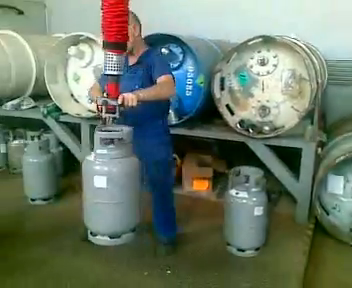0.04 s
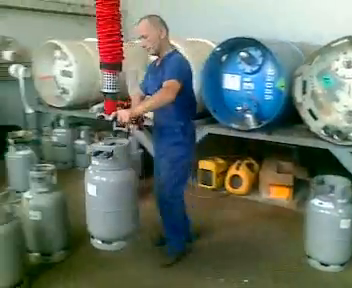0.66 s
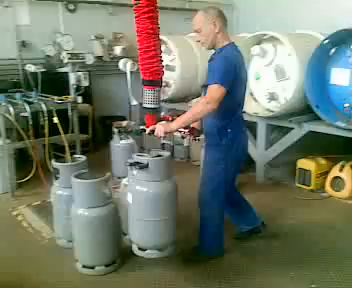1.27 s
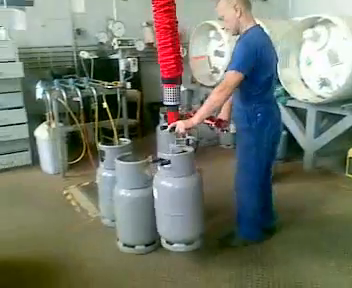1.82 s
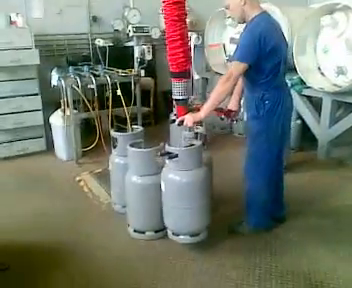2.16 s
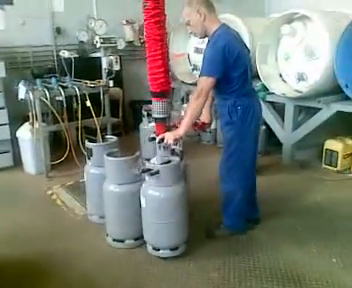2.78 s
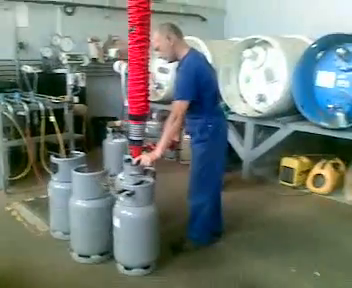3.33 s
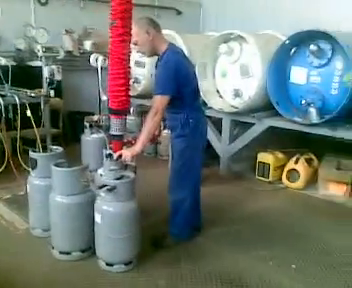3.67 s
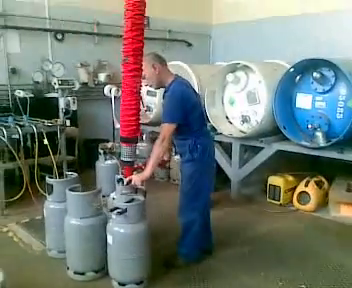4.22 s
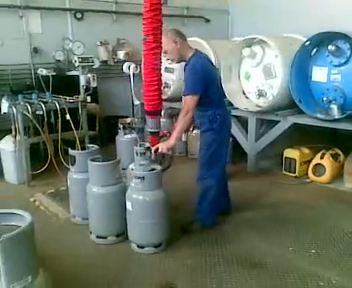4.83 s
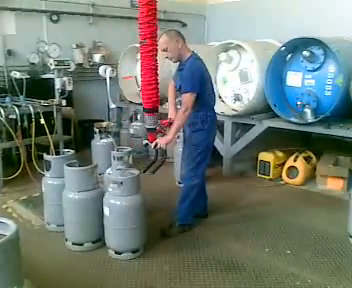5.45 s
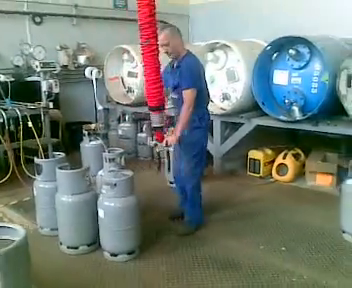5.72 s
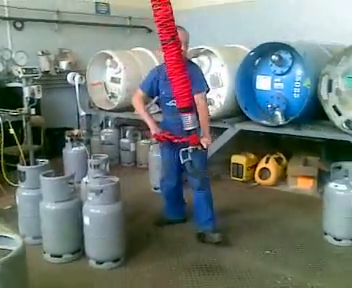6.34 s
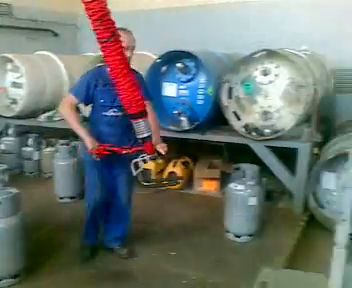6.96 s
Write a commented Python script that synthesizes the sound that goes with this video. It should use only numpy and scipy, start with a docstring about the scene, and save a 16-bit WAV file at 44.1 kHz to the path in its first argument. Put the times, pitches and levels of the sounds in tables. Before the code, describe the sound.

In a workshop, a vacuum lifter's sealed suction head hisses quietly a few metres from a small hand-held microphone. Close handling thumps, soft rubs and rumble are the loudest sounds at first. Then the lifter lets go of its gas cylinder, and a soft rush of air takes over, with a ringing drone, a faint whine, a low hose throb and pump hum. The rush surges twice and loses brightness near the end.

```python
"""A low rumble and dull, dry knocks come first, right at the microphone: a hand on the camera's case.
A few metres off in the workshop, a vacuum tube lifter carries a gas cylinder, its sealed head leaking
a thin hiss. Once the load is set down the valve opens: air rushes up the long hose, rings the head
and the hose, and lets the pump's hum out. The rush dulls as the empty head is carried off."""
import sys
import numpy as np
from scipy import signal
from scipy.fft import rfft, irfft
from scipy.io import wavfile
from scipy.ndimage import map_coordinates

SR = 44100
rng = np.random.default_rng(int(sys.argv[2]) if len(sys.argv) > 2 else 0)


def persist_wave(psi):
    """Save psi, clipped to +-1, as 16-bit WAV."""
    counts = np.round(np.clip(psi, -1, 1) * 32767).astype(np.int16)
    wavfile.write(sys.argv[1], SR, np.atleast_2d(counts).T)


N = 317520
TIME = np.arange(N) / SR
BIN_HZ = np.maximum(np.arange(N // 2 + 1) * SR / N, 1)


# colour of the rushing air, a few metres off: (frequency [Hz], relative level [dB])
RUSH_COLOUR = [(90, -6.5), (170, -4.5), (300, -6.5), (500, -6.5), (680, -12), (1250, -9), (1750, -19),
               (2850, -22.5), (3300, -26.5), (4300, -24.5), (5700, -30.5), (6200, -30.5), (7400, -48.5)]

def suction(valve, carried, draught_db, rush_db=-60.5, flutter_db=0.24, dulling_db=4):
    """Air rushes through the valve and rings the head; carried off, it gains bass and loses treble."""
    jet = noise(colour(RUSH_COLOUR), band=(550, 2500))
    eddies = noise(colour(RUSH_COLOUR), band=(550, 2500))
    air = jet + suction_head(eddies, draught_db)
    bass = signal.sosfiltfilt(signal.butter(2, 400, fs=SR, output="sos"), air)
    treble = signal.sosfiltfilt(signal.butter(2, 1900, "high", fs=SR, output="sos"), air)
    tilt_db = dulling_db * carried
    rush = air + bass * (undb(tilt_db) - 1) + treble * (undb(-tilt_db) - 1)
    return valve * rush * undb(rush_db + draught_db + flutter_db * walk(22))


# surges of the draught: (time [s], length [s], boost [dB])
DRAUGHT_SURGES = [(5.55, 1.0, 5), (6.74, 0.78, 3.5)]

def airflow(carried_drop_db=3.5):
    """The valve opens (0 to 1), the head is carried off (0 to 1), the draught swells and sags (dB)."""
    valve = ramp(start=4.137, length=0.39)
    carried = ramp(start=6.2, length=0.46)
    draught_db = swells(DRAUGHT_SURGES, attack=0.24, release=0.422) - carried_drop_db * carried
    return valve, carried, draught_db


# resonances of the suction head: (frequency [Hz], width [Hz], relative level [dB])
HEAD_MODES = [(440, 8, 10), (463, 11, 15.5), (485, 12, 10), (535, 28, 2), (1105, 8, 6.5), (1355, 16, 13.5),
              (1394, 48, 8)]
# the head drones on the cylinder, and most as it comes off: (time [s], length [s], boost [dB])
SEATED_SWELLS = [(4.15, 1.6, 2.5), (5.1, 0.39, 5.5)]

def suction_head(eddies, draught_db, level_db=-2.0, follow=0.1, rise_per_db=0.0006, wander=0.0012):
    """The head's resonances waver and rise with the draught; the cylinder boosts mostly the low ones."""
    ringing = irfft(rfft(eddies) * np.sqrt(peaks(HEAD_MODES)), N)
    whistle = bend(ringing, rise_per_db * draught_db + wander * walk(1.993))
    drone = signal.sosfiltfilt(signal.butter(4, 800, fs=SR, output="sos"), whistle)
    whine = whistle - drone
    seated_db = swells(SEATED_SWELLS, attack=0.3, release=0.17)
    return undb(level_db + follow * draught_db) * (drone * undb(seated_db) + whine * undb(seated_db / 4))


# air modes of the long hose: (frequency [Hz], width [Hz], relative level [dB])
HOSE_MODES = [(34.8, 6.7, 2.5), (77.3, 8.1, 0), (107, 11, -4), (161.7, 35, -10), (224, 30, -17.5)]

def hose(valve, draught_db, level_db=-52, follow=0.79):
    """The flow rings the air column in the hose, louder as the draught grows."""
    column = noise(np.sqrt(peaks(HOSE_MODES)))
    return valve * column * undb(level_db + follow * draught_db)


def hose_throb(valve, carried, draught_db, hz=35.63, follow=0.35):
    """The hose's two lowest modes throb while air flows; the lower fades as the head is carried off."""
    lowest = tone(hz, db=-55 - 7.5 * carried, drift=0.014, waver_db=6.5)
    octave = tone(2 * hz, db=-56.5, drift=0.01324, waver_db=-2.0)
    return valve * (lowest + octave) * undb(follow * draught_db)


def pump(valve, draught_db, hz=340.8, sealed_db=-84, open_db=-58.4, follow=0.7):
    """The pump's tone comes down the hose, faint until the valve opens, and swells with the draught."""
    gain = undb(sealed_db) + valve ** 1.1 * undb(open_db + follow * draught_db)
    return gain * tone(hz, db=0, drift=0.002, waver_db=0.5)


# colour of the leak at the sealed head: (frequency [Hz], relative level [dB])
LEAK_COLOUR = [(200, -10.5), (380, -9.5), (520, -10.5), (700, -15), (1250, -12.5), (1750, -18.5),
               (3500, -20), (4100, -18.5), (5500, -21), (6800, -19), (7400, -24.5)]
# faint whistles of the head's gaps: (frequency [Hz], width [Hz], level over the leak [dB])
GAP_WHISTLES = [(1377, 140, 6), (2457, 220, 2), (3020, 340, -0.5)]
# the leak's treble as it reaches the microphone: (time [s], level [dB])
LEAK_LOUDNESS = [(0, -71), (1.2, -73.5), (2.4, -71.5), (4.2, -72)]

def leak(cavity_db=-7, waver_db=0.65):
    """Air hisses thinly through the head's narrow gaps, faintly coloured by its cavity."""
    resonance = np.sqrt(1 + undb(cavity_db) ** 2 * peaks(HEAD_MODES) + peaks(GAP_WHISTLES))
    hiss = noise(colour(LEAK_COLOUR) * resonance, band=(1600, 7000))
    return hiss * undb(curve(LEAK_LOUDNESS) + waver_db * walk(7.6))


# knocks on the camera, right at the microphone: (time [s], level [dB], pitch [Hz], contact [ms])
CASE_KNOCKS = [(0.3622, -19.5, 76.7, 0.31), (0.4, -32.5, 74.4, 0.45), (1.494, -34, 92, 0.81),
               (2.679, -19, 77, 0.33), (2.73, -33, 59, 0.68), (2.797, -25, 75.6, 0.7), (2.956, -40, 34, 2),
               (2.995, -42.5, 62, 1.4), (3.026, -39, 52.3, 1.2), (3.088, -42, 70, 1.2),
               (3.16, -27.5, 48, 0.9), (3.192, -32, 99, 0.41), (3.798, -25.5, 64.5, 0.62),
               (3.952, -36, 133, 0.38), (3.9695, -24, 193, 0.31), (3.9722, -26, 62, 1.3),
               (3.9759, -25.5, 342, 0.16), (4.105, -28.5, 68, 1.8), (4.134, -29.5, 70, 1.8),
               (4.157, -35, 70, 2)]
# modes of the camera's case: (frequency [Hz], width [Hz], relative level [dB])
CASE_MODES = [(429, 79, 5), (550, 410, 1.5), (800, 350, -10.5), (1090, 140, -7), (2500, 1200, 3)]

def knocks(push_cycles=0.32, click_at_1ms_db=-39.5, db_per_halving=13):
    """Each push rocks the microphone briefly; soft contacts blur it, hard ones also click the case."""
    out = np.zeros(N)
    lead = SR // 10
    t = np.arange(-lead, lead + 1) / SR
    for start, thump_db, hz, contact_ms in CASE_KNOCKS:
        contact = np.exp(-(t * 1000 / contact_ms) ** 2 / 2)
        push = -np.sin(np.pi * np.clip(t * hz / push_cycles, 0, 1))
        blurred = signal.fftconvolve(push, contact, "same")
        thump = ring(ring(blurred, hz, width=hz), hz, width=hz)
        # the shorter the contact, the louder the click and the higher the modes it reaches
        click_db = thump_db + click_at_1ms_db - db_per_halving * np.log2(contact_ms)
        click = sum(undb(db) * ring(-contact, mode_hz, width) for mode_hz, width, db in CASE_MODES)
        i = int(start * SR) - lead
        out[i:i + len(t)] += at_peak(thump, thump_db) + at_peak(click, click_db)
    return out


# rumble of the hand, through the case to the microphone: (frequency [Hz], relative level [dB])
GRIP_COLOUR = [(8.8, -32.5), (22, 3.5), (40, -3), (81, -10.5), (118, -27), (151, -30), (251, -39.5),
               (400, -48), (880, -100)]
# flutter of the fingers on the case: (frequency [Hz], relative level [dB])
FINGER_COLOUR = [(60, -1.5), (90, -0.5), (130, -10.5), (180, -13.5), (260, -19.5), (400, -33.5), (700, -69)]
# the hand shifts its grip: (time [s], length [s], boost [dB])
GRIP_SWELLS = [(0.36, 0.45, 9), (2.85, 1.98, 4), (4.5, 0.49, 9)]

def handling(level_db=-48.5, rest_drop_db=9, fingers_db=-11):
    """The grip rumbles and the fingers flutter unevenly; both ease when the camera comes to rest."""
    grip_db = level_db - rest_drop_db * ramp(start=4.5, length=0.16)
    shift_db = swells(GRIP_SWELLS, attack=0.081, release=0.54)
    rumble = noise(colour(GRIP_COLOUR)) * undb(grip_db + shift_db + 0.5 * walk(3.7))
    flutter = noise(colour(FINGER_COLOUR)) * undb(grip_db + fingers_db + 0.64 * shift_db + 3 * walk(14))
    return rumble + flutter


# small, hollow clacks: (time [s], peak level [dB], contact [ms])
HOLLOW_CLACKS = [(2.9103, -46.5, 0.17), (3.0245, -35, 0.092)]
# the modes they ring: (frequency [Hz], width [Hz], relative level [dB])
HOLLOW_MODES = [(190, 110, 12.5), (503, 115, 8), (780, 140, -5), (1150, 80, -6), (2140, 160, -1),
                (3300, 470, 10.5), (4300, 250, 7)]

def clacks():
    """Each brief, hard touch sets a few quickly damped modes ringing."""
    out = np.zeros(N)
    for start, peak_db, contact_ms in HOLLOW_CLACKS:
        age = np.maximum(TIME - start, 0) * 1000 / contact_ms  # in contact times
        contact = age ** 2 * np.exp(-np.minimum(age, 60)) + 1e-18
        ringing = sum(undb(db) * ring(contact, hz, width) for hz, width, db in HOLLOW_MODES)
        out += at_peak(ringing, peak_db)
    return out


# soft rubs beside the microphone: (time [s], length [s], level [dB], centre [Hz])
SKIN_RUBS = [(1.535, 0.16, -66, 464), (1.675, 0.13, -66, 316), (1.79, 0.19, -72, 400),
             (2.922, 0.062, -60, 310), (2.964, 0.088, -63.5, 298), (3.028, 0.096, -69, 367)]

def rubs(relative_width=0.85):
    """Skin slides over the case in short swells of friction noise."""
    out = np.zeros(N)
    friction = rng.standard_normal(N)
    for start, length, db, hz in SKIN_RUBS:
        width = relative_width * hz
        rub = ring(ring(friction, hz, width), hz, width)
        out += rub / np.std(rub) * undb(db) * np.sin(np.pi * ramp(start, length))
    return out


def murmur(hz=264, width_hz=16, level_db=-61.5):
    """A narrow band of noise fades in as a soft hum behind the rush."""
    hum = noise(np.sqrt(peaks([(hz, width_hz, 0)])))
    return hum * undb(level_db) * ramp(start=5.27, length=1.2)


def undb(db):
    """Decibels to gain."""
    return 10 ** (np.asarray(db) / 20)


def at_peak(x, db):
    """Scales a sound to a given peak level."""
    return undb(db) * x / abs(x).max()


def curve(rows):
    """A table joined by straight lines in time."""
    return np.interp(TIME, *np.transpose(rows))


def ramp(start, length):
    """Rises from nought to one and stays there; times in seconds."""
    return np.clip((TIME - start) / length, 0, 1)


def swells(rows, attack, release):
    """Extra decibels from events that rise, hold and fall; times in seconds."""
    return sum(db * np.minimum(ramp(start, attack), 1 - ramp(start + length - release, release))
               for start, length, db in rows)


def colour(points):
    """Gain at each frequency from (frequency [Hz], level [dB]) points, falling steeply below the first."""
    hz, db = np.transpose(points)
    bass_cut = np.minimum(BIN_HZ / hz[0], 1) ** 2
    return undb(np.interp(np.log(BIN_HZ), np.log(hz), db)) * bass_cut


def peaks(modes):
    """Power response of a set of resonances."""
    return sum(undb(db) ** 2 / (1 + 2 * ((BIN_HZ - hz) / width) ** 2) ** 2 for hz, width, db in modes)


def noise(gain, band=(0, SR)):
    """Noise of a given colour, with an rms of one inside the band (Hz)."""
    spectrum = rfft(rng.standard_normal(N)) * gain
    inside = (BIN_HZ > band[0]) & (BIN_HZ < band[1])
    return irfft(spectrum, N) / np.std(irfft(spectrum * inside, N))


def walk(rate_hz):
    """Slow random wander with a spread of one."""
    return noise(1 / (1 + (BIN_HZ / rate_hz) ** 4))


def tone(hz, db, drift, waver_db):
    """A sine that wanders about a given pitch and rms level."""
    phase = 2 * np.pi * np.cumsum(hz * (1 + drift * walk(2.36))) / SR
    return np.sqrt(2) * np.sin(phase) * undb(db + waver_db * walk(4.5))


def ring(x, hz, width):
    """One resonance, gain one at its centre."""
    return signal.lfilter(*signal.iirpeak(hz, hz / width, fs=SR), x)


def bend(x, shift):
    """Moves every pitch in a sound by a small, changing fraction."""
    return map_coordinates(x, [np.cumsum(1 + shift)], order=1, mode="mirror")


def scene():
    """The lifter a few metres off in the workshop, and the camera's own noises at the microphone."""
    valve, carried, draught_db = airflow()
    air = leak() + suction(valve, carried, draught_db) + hose(valve, draught_db)
    hums = pump(valve, draught_db) + hose_throb(valve, carried, draught_db) + murmur()
    camera = handling() + rubs() + knocks() + clacks()
    return (air + hums + camera)[None]


def record(dry):
    """The hand-held camera's small mono microphone: no deepest bass, and nothing above 8.3 kHz."""
    dry = signal.sosfilt(signal.butter(2, 16, "high", fs=SR, output="sos"), dry)
    return signal.sosfilt(signal.cheby2(16, 70, 8300, fs=SR, output="sos"), dry)


dry = scene()
out = record(dry)
persist_wave(out)
```